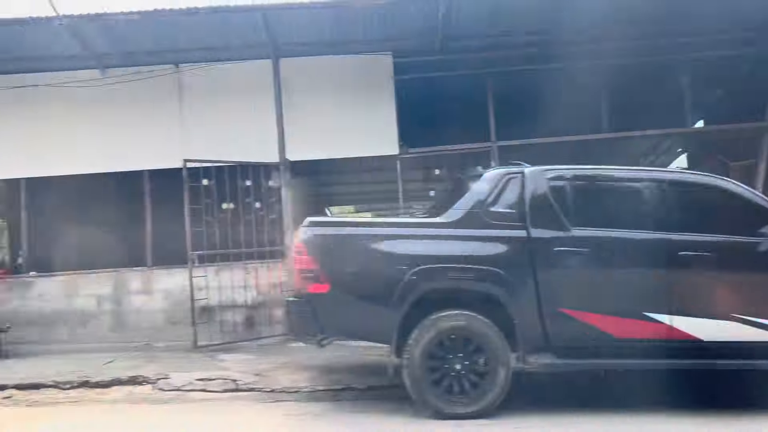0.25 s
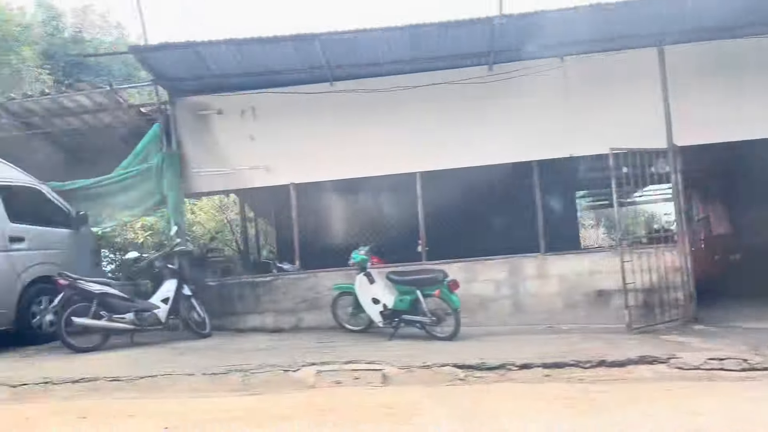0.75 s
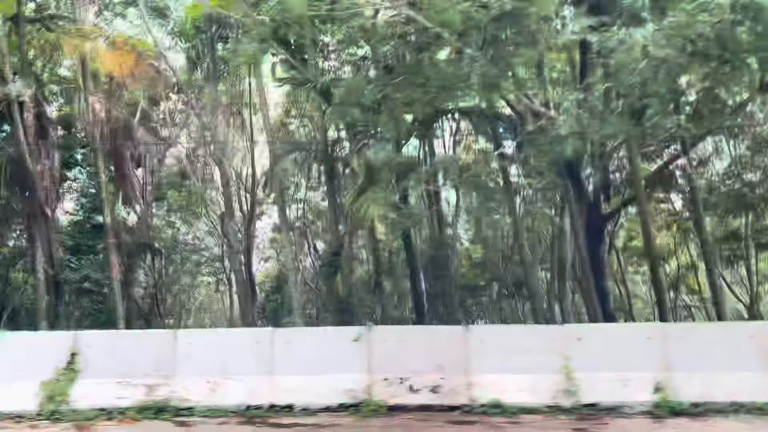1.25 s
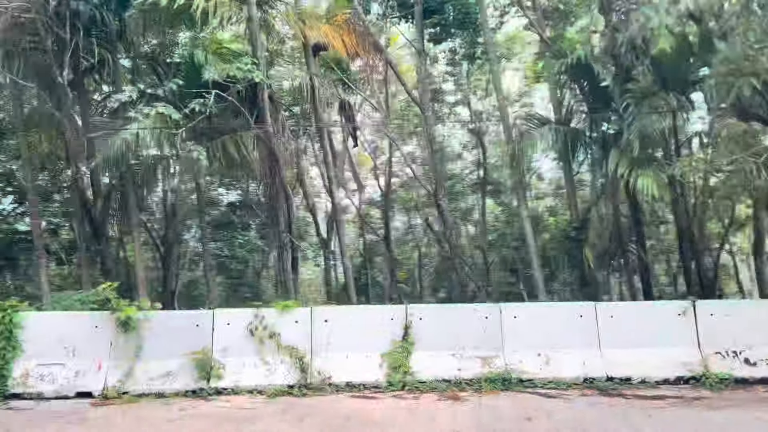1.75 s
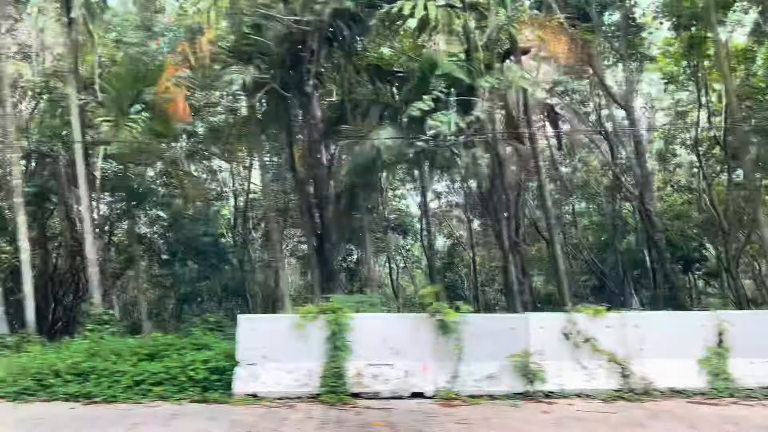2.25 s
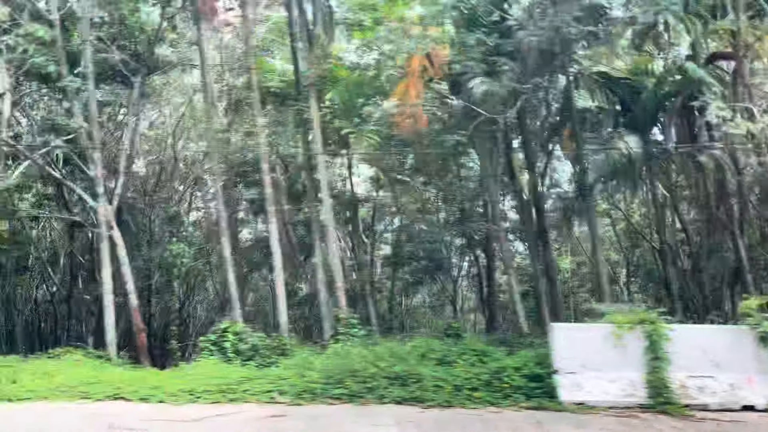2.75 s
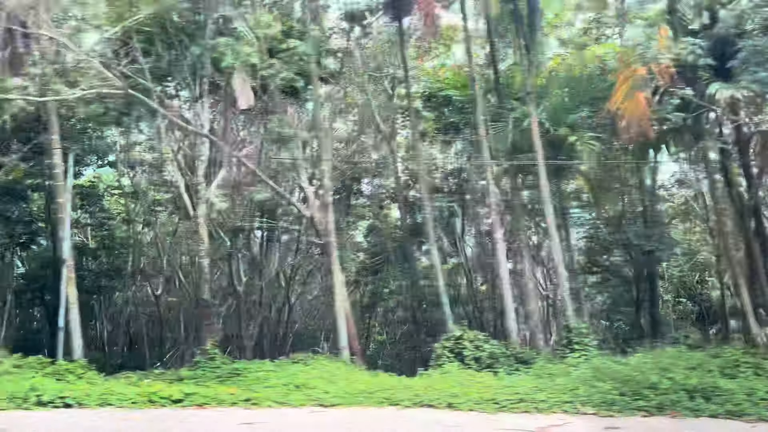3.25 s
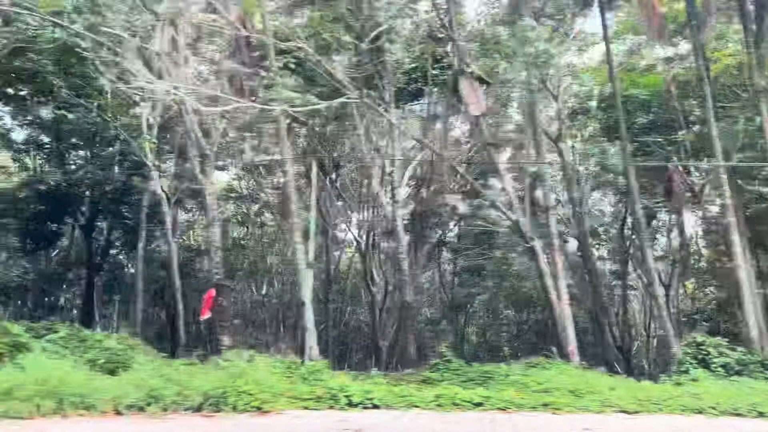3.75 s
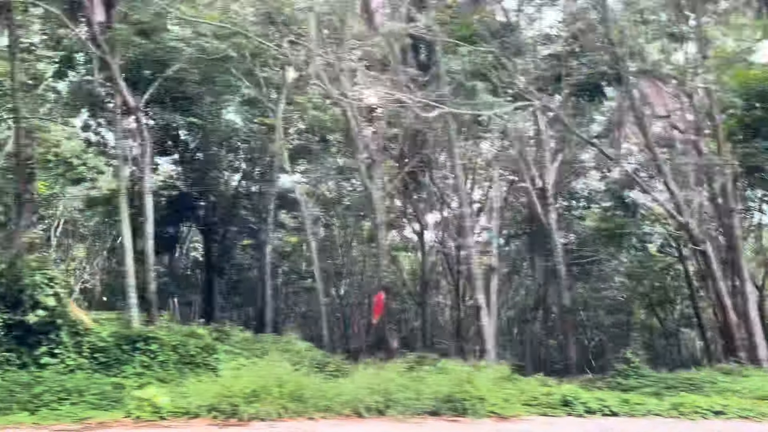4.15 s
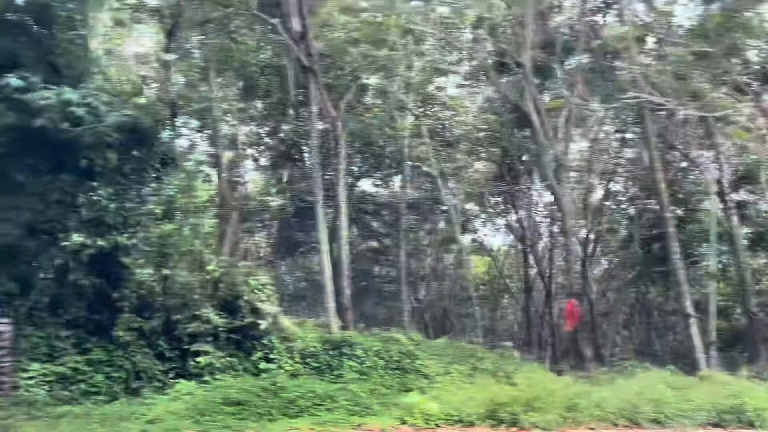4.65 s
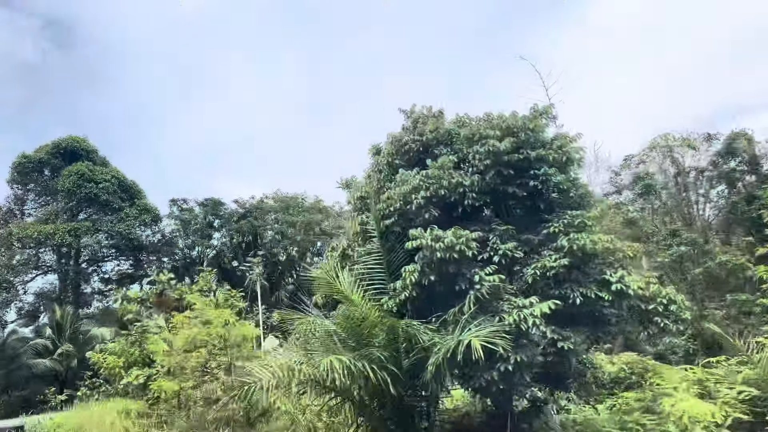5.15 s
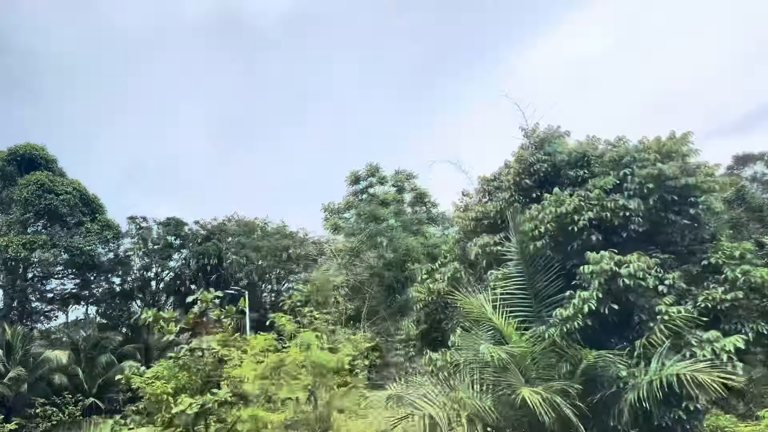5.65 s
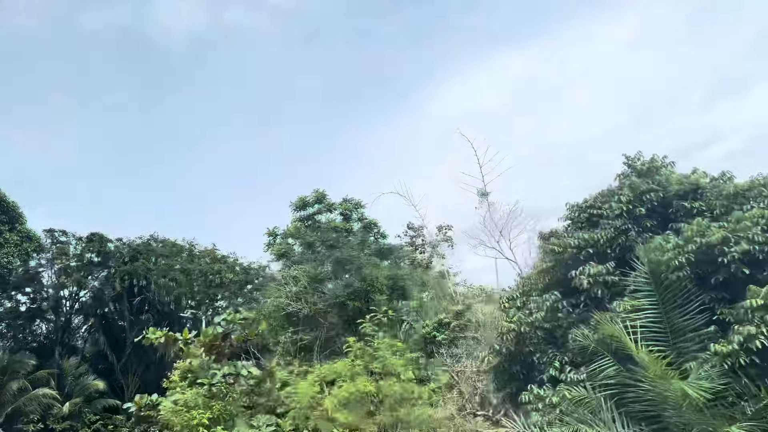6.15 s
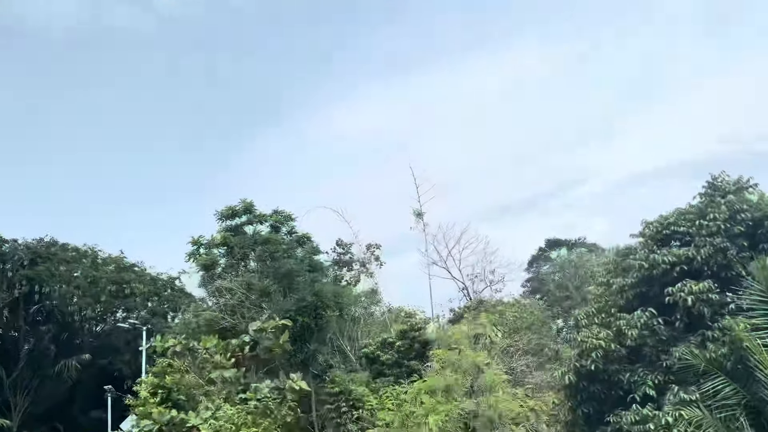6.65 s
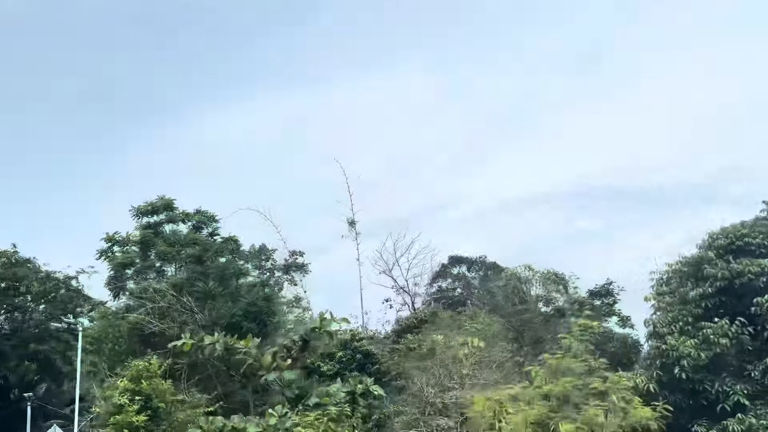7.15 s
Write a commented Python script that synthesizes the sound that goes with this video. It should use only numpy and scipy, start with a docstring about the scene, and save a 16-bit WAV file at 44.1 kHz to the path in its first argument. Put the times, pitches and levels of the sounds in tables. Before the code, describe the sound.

Outdoors in forest, a close cicada sings bursts of very quick falling sweeps around a high pitch, against a dense chorus of others with steady hiss and faint bird notes. Everything stops abruptly just before five seconds. After a tiny gap a dull pop opens a quiet moving vehicle cabin: uneven deep rumble, soft irregular knocks, and loose trim ticking and rattling, growing stronger toward the end.

```python
"""A near cicada sings phrases of quick falling sweeps; others sweep out of step within a noise band of chorus.
A high hissing and a low buzzing kind (band noise), faint chirps, a thin whistle and bird notes lie behind.
The forest stops dead; after a short silence a dull pop (click plus pressure push) opens a moving cabin:
jolting road rumble and body drone (shaped noise), irregular low knocks (damped sines), and trim that
rustles, rattles and ticks (noise and short rings)."""
import sys
import numpy as np
from scipy import signal
from scipy.fft import rfft, irfft
from scipy.io import wavfile
from scipy.ndimage import uniform_filter1d

SR = 44100
rng = np.random.default_rng(int(sys.argv[2]) if len(sys.argv) > 2 else 0)


def transcribe(u):
    """Save the signal u as a 16-bit wav file named by the first command-line argument.

    u: samples, shape (n,) or (channels, n), limited to [-1, 1]; the rate is SR.
    q: integer samples, one column per channel.
    """
    v = np.clip(np.atleast_2d(u).T, -1, 1)
    q = np.round(v * 32767).astype(np.int16)
    wavfile.write(sys.argv[1], SR, q)


N = 326340
TIME = np.arange(N) / SR
CUT_S, POP_S = 4.857, 4.885
TOP_HZ = 15500


def near_cicada(direct_db=-0.5, echo_db=-8, left_db=-2.5, flutter_db=2.5):
    """Quick, fluttering downward sweeps, heard directly and off the trees."""
    song = syllables(phrased_song(), pitch_hz=3792, scatter_hz=18, fall_hz=519.5, half_length_s=.039)
    song = song * unit(undb(flutter_db * walk(420)))
    echo = trees(song, t60_s=0.17, side_db=-7.0)
    return (undb(direct_db) * song + undb(echo_db) * echo) * lean(left_db)


# near cicada phrases: (start_s, end_s, sweeps_per_s, crest_level_db); level before direct_db, echo_db
PHRASES = [(0.041, 0.72, 11.3, -56), (0.929, 1.66, 15, -48.5), (1.757, 2.12, 10.2, -53.5),
           (2.245, 2.78, 13.4, -50), (2.888, 3.16, 11.4, -53), (3.452, 4.11, 14.5, -52),
           (4.172, 4.73, 15.1, -47.5)]


def phrased_song(sag_db=1, scatter_db=1.36):
    """Rows (time_s, level_db): even beat within a phrase, weaker at both ends, sweeps differ a little."""
    rows = []
    for start_s, end_s, sweeps_per_s, crest_db in PHRASES:
        times_s = np.arange(start_s, end_s, 1 / sweeps_per_s)
        sag = sag_db * np.linspace(-1, 1, len(times_s)) ** 2
        scatter = scatter_db * rng.standard_normal(len(times_s))
        rows += zip(times_s, crest_db - sag + scatter)
    return rows


def steady_song(rate_hz, spread_db, unevenness):
    """Rows (time_s, level_db) of a singer that keeps a nearly even beat."""
    times_s = np.cumsum((1 + unevenness * rng.uniform(-1, 1, 180)) / rate_hz)
    levels_db = spread_db * rng.standard_normal(len(times_s))
    return np.column_stack([times_s, levels_db])[times_s < CUT_S]


def syllables(rows, pitch_hz, scatter_hz, fall_hz, half_length_s):
    """In each syllable the ring slides down, fall_hz either side of its pitch, as it swells and fades."""
    out, waver_hz = np.zeros(N), 20 * walk(350)
    for s, level_db in rows:
        near = slice(max(int((s - half_length_s) * SR), 0), int((s + half_length_s) * SR))
        u = np.clip((TIME[near] - s) / half_length_s, -1, 1)
        centre_hz = pitch_hz + scatter_hz * rng.standard_normal()
        phase = tone(centre_hz + waver_hz[near] - fall_hz * u) + 2 * np.pi * rng.random()
        out[near] += undb(level_db) * np.cos(np.pi * u / 2) ** 2.36 * np.sin(phase)
    return out


# spectrum of the merged chorus: (freq_hz, level_db)
CHORUS_SPECTRUM = [(2900, -32), (3250, -16), (3450, -10), (3650, 1.5), (3850, -14.5), (4030, 4.5),
                   (4150, -14), (4300, -14), (4700, -30.5)]


def far_cicadas(count=3, rate_hz=16.0, echo_db=-4, crowd_db=-2, left_db=-3.0):
    """Others of the same kind sweep out of step; behind them the crowd merges into one band."""
    ring = np.zeros(N)
    for _ in range(count):
        rows = steady_song(rate_hz, spread_db=1, unevenness=.2)
        ring += syllables(rows, pitch_hz=3763, scatter_hz=70.9, fall_hz=361.0, half_length_s=.03)
    echo = unit(trees(ring, t60_s=0.31, side_db=-6.5))
    crowd = colour(stereo_noise(-19), CHORUS_SPECTRUM)
    return unit(unit(ring) + undb(echo_db) * echo + undb(crowd_db) * crowd) * lean(left_db)


# spectrum of the hissing kind: (freq_hz, level_db)
HISS_SPECTRUM = [(5600, -32), (6200, -19.5), (6600, -5), (7030, -1), (7300, -5.5), (7600, -16.5),
                 (8000, -20.5), (8800, -32.5)]


def hissing_insects(level_db):
    """A high kind merged into a nearly steady noise band."""
    band = colour(stereo_noise(side_db=-2.5, left_db=1.5), HISS_SPECTRUM)
    return band * undb(level_db + 3.0 + 0.22 * walk(120))


# spectrum of the buzzing kind: (freq_hz, level_db)
BUZZ_SPECTRUM = [(1750, -28), (2030, -8.5), (2190, 2.5), (2310, -1.5), (2450, -22.5), (2700, -15.5)]


def buzzing_insects(level_db):
    """A low kind merged into a noise band of unsteady level."""
    band = colour(stereo_noise(side_db=-4.5, left_db=-1.0), BUZZ_SPECTRUM)
    return band * undb(level_db + walk(60))


def high_chirps(level_db=-81.8, rate_hz=26, echo_db=-5):
    """Faint, quick falling chirps tick away far above the chorus."""
    rows = steady_song(rate_hz, spread_db=1.5, unevenness=.25)
    song = syllables(rows, pitch_hz=11340, scatter_hz=160, fall_hz=700, half_length_s=0.02)
    song = unit(song * undb(3.0 * walk(500)))
    return undb(level_db) * (song + undb(echo_db) * trees(song, t60_s=0.18, side_db=-4))


# thin insect whistle: (time_s, pitch_hz, level_db); level before the direct and tree gains
WHISTLE = [(3.4, 4594, -100), (3.8, 4650, -78), (3.95, 4638, -75), (4.17, 4657, -70), (4.3, 4600, -80),
           (4.85, 4590, -75)]


def insect_whistle():
    """One wavering sine of pulsing level."""
    pitch_hz, level_db = curves(WHISTLE)
    return undb(level_db + 3.2 * walk(40)) * np.sin(tone(pitch_hz + 20 * walk(200)))


# far bird notes: (peak_s, half_pitch_hz, level_db, length_s); level before the direct and tree gains
BIRD = [(0.127, 1530, -73, 0.1), (1.234, 1530, -69.5, 0.051), (2.23, 2290, -77, 0.054)]


def bird_notes():
    """Short bell-shaped notes with a weak partial an octave below."""
    notes = np.zeros(N)
    for peak_s, half_pitch_hz, level_db, length_s in BIRD:
        phase = tone(half_pitch_hz + 26 * walk(250))
        envelope = undb(level_db) * np.exp(-(2 * (TIME - peak_s) / length_s) ** 2)
        notes += envelope * (np.sin(2 * phase) + 0.25 * np.sin(phase))
    return notes


def small_voices():
    """Whistle and bird notes, direct and scattered by the trees."""
    whistle, notes = insect_whistle(), bird_notes()
    return 0.87 * (whistle + notes) + trees(0.44 * whistle + notes, t60_s=0.22, side_db=-8)


# spectrum of the forest air: (freq_hz, level_db)
AIR_SPECTRUM = [(30, 2.5), (130, -3.5), (230, 0.5), (400, -4), (800, -6), (1400, -1.5), (2700, 2),
                (4600, 6), (5600, 0), (9800, 0), (11300, 2), (13500, 0), (15500, -2)]


def forest_air(level_db=-69.0):
    """Faint even hiss."""
    return colour(stereo_noise(side_db=-2.5), AIR_SPECTRUM) * undb(level_db)


# insect levels before trims: (time_s, chorus_db, hiss_db, buzz_db)
INSECT_LEVELS = [(0, -49.5, -62.5, -74.5), (.4, -54.5, -64, -76), (1.2, -50.5, -63, -76.5),
                 (1.9, -52.5, -63.5, -76), (2.6, -52, -64, -76.5), (3.3, -54.5, -63.5, -77.5),
                 (4.1, -53, -63, -74), (4.85, -50.5, -63.5, -75.5)]


def forest(chorus_trim_db=-4.0):
    """All the insects and birds over the air."""
    chorus_db, hiss_db, buzz_db = curves(INSECT_LEVELS)
    cicadas = near_cicada() + far_cicadas() * undb(chorus_db + chorus_trim_db)
    others = hissing_insects(hiss_db) + buzzing_insects(buzz_db) + high_chirps() + small_voices()
    return cicadas + others + forest_air()


def trees(x, t60_s, side_db):
    """Trunks and leaves scatter a sound into a short diffuse tail."""
    size = SR // 2
    tail = stereo_noise(side_db)[:, :size] * 1000 ** (-TIME[:size] / t60_s)
    tail /= np.sqrt(np.sum(tail ** 2) / 2)
    return signal.fftconvolve(x[None], tail, axes=1)[:, :N]


def pop(click_db=-27, click_s=0.00079, push_db=-24, peak_s=0.00577, swell_s=0.0031, release_s=0.00085):
    """A sharp click and a one-sided push of pressure that builds and lets go, dulled by a low-pass."""
    t = np.maximum(TIME - POP_S, 0)
    swell = (peak_s - t) / swell_s
    release = ((t - peak_s) / release_s) ** 2
    push = np.exp(-np.where(t < peak_s, swell, release))
    click = np.exp(-t / click_s)
    pressure = (t > 0) * (undb(click_db) * click + undb(push_db) * push)
    return signal.sosfilt(signal.butter(1, 2500, fs=SR, output="sos"), pressure)


def vehicle(judder_db=3.0, rattle_db=-0.6):
    """Road and body shaken by the ride, trim that rustles and rattles in fits, knocks, ticks and the pop."""
    road, body, trim = shaking()
    trim = trim * undb(judder_db * walk(70))
    ride = road_rumble(road) + body_drone(body) + trim_rustle(trim)
    return ride + rattle() * trim * undb(rattle_db) + knocks() + ticks() + pop()


# steady ride, before layer trims: (time_s, rumble_db, drone_db, rustle_db)
CRUISE = [(4.9, -70.5, -87, -94), (5.14, -77, -82.5, -93), (5.38, -71, -70, -83.5), (5.67, -74, -76, -85),
          (6.03, -68, -62, -84.5), (6.4, -55.5, -66, -81.5), (6.9, -61, -60, -86.5), (7.4, -62, -57.5, -84)]
# bumps that shake the whole cabin, before layer trims: (peak_s, rumble_db, decay_s, rustle_db)
JOLTS = [(4.92, -62, 0.063, -93), (5.334, -56.5, 0.047, -82), (5.446, -56, 0.039, -70),
         (5.613, -59.5, 0.024, -78.5), (5.771, -50, 0.042, -74.5), (5.855, -49.5, 0.058, -80.5),
         (5.951, -52, .025, -91), (6.172, -53.5, 0.041, -76.5), (6.26, -51.5, 0.039, -72),
         (6.306, -50, 0.029, -70.5), (6.506, -47, .035, -69), (6.77, -56, 0.1, -75.5),
         (6.853, -49.5, 0.025, -69.5), (7.006, -46.5, 0.02, -78), (7.09, -48.5, 0.044, -70.5),
         (7.311, -46.5, 0.094, -72.5), (7.395, -49, 0.016, -69)]


def shaking(swell_share=0.79, drone_re_rumble_db=-3.5):
    """Gains of rumble, drone and rustle: the ride plus, in power, a surge that dies away after each bump."""
    road, body, trim = undb(curves(CRUISE))
    for peak_s, rumble_db, decay_s, rustle_db in JOLTS:
        surge = blow(TIME - peak_s, swell_share * decay_s, decay_s)
        road = np.hypot(road, undb(rumble_db) * surge)
        body = np.hypot(body, undb(rumble_db + drone_re_rumble_db) * surge)
        trim = np.hypot(trim, undb(rustle_db) * surge)
    return road, body, trim


# spectrum of the road: (freq_hz, level_db)
ROAD_SPECTRUM = [(15, -8.5), (35, -10), (58, 7), (90, -1), (130, -5.5), (220, -32.5)]


def road_rumble(gain, trim_db=-2.0):
    """Deep noise that follows the shaking."""
    return colour(rng.standard_normal(N), ROAD_SPECTRUM) * gain * undb(trim_db)


# modes of the padded panels, before knock gains: (peak_s, peak_db, pitch_hz, decay_s)
KNOCKS = [(4.91, -44, 391, 0.0081), (4.968, -51.5, 232, 0.0093), (5.002, -44, 198, 0.0074),
          (5.266, -43.5, 391, 0.0083), (5.284, -48.5, 267, 0.016), (5.326, -37, 200.5, 0.011),
          (5.426, -50, 191, 0.014), (5.77, -42, 176.7, .011), (5.848, -41.5, 319, 0.0083),
          (5.857, -22.5, 158.5, 0.0089), (5.896, -48.5, 620, 0.0058), (5.908, -45, 217, 0.016),
          (6.176, -51, 212.7, 0.0085), (6.303, -39.5, 282.2, 0.002), (6.497, -44, 241.4, 0.022),
          (6.525, -37, 195.6, 0.015), (6.785, -44, 198, 0.0084), (6.999, -36, 331.3, 0.014),
          (7.045, -39.5, 279, 0.018), (7.153, -44.5, 319, .028), (7.275, -41, 187, 0.014),
          (7.3, -27, 194.7, 0.0096), (7.301, -39, 424.3, 0.015), (7.34, -43.5, 241.8, 0.014)]
# spectrum of a knock's thud: (freq_hz, level_db)
THUD_SPECTRUM = [(30, -16.5), (150, -1), (400, 1.5), (700, -22), (1100, -24), (1600, -35), (4000, -44)]


def knocks(overtone_db=-24, thud_db=-19, wobble=0.0708, swell_share=0.79):
    """Bumps load a padded panel: it rings unevenly a few cycles with a weak upper mode and a dull thud."""
    out, force = np.zeros((2, N))
    load = wobble * walk(160)  # relative pitch flutter
    for peak_s, peak_db, pitch_hz, decay_s in KNOCKS:
        near = slice(int((peak_s - .1) * SR), int((peak_s + .2) * SR))
        envelope = undb(peak_db) * blow(TIME[near] - peak_s, swell_share * decay_s, decay_s)
        bend = load[near] - np.average(load[near], weights=envelope ** 2)  # mean pitch stays pitch_hz
        phase = tone(pitch_hz * (1 + bend)) + 2 * np.pi * rng.random()
        out[near] += envelope * (np.sin(phase) + undb(overtone_db) * np.sin(1.87 * phase))
        force[near] += envelope
    return out + undb(thud_db) * force * colour(rng.standard_normal(N), THUD_SPECTRUM)


# spectrum of the cabin body: (freq_hz, level_db)
BODY_SPECTRUM = [(70, -17), (130, -0.5), (190, 2.5), (260, -2), (320, 0.5), (390, -13.5), (510, -9.5),
                 (630, -24.5), (800, -23.5), (970, -22.5), (1250, -44), (2500, -43.5)]


def body_drone(gain, trim_db=1):
    """Low noise of the cabin body, jolting and unsteady."""
    return colour(rng.standard_normal(N), BODY_SPECTRUM) * gain * undb(trim_db + 2.85 * walk(45))


# trim slips, before tick_db: (peak_s, peak_rms_db, ring_hz, decay_s)
TICKS = [(4.97, -76, 8500, 0.009), (4.998, -58.5, 6160, 0.0036), (5.0, -76.5, 1360, 0.015),
         (5.147, -78.5, 6000, 0.017), (5.221, -65, 5830, .006), (5.273, -54, 5400, 0.0046),
         (5.446, -52.5, 3450, 0.0032), (5.453, -49, 3120, 0.0023), (5.606, -69, 5430, 0.003),
         (5.729, -68, 6150, 0.0044), (5.781, -59.5, 8300, 0.002), (5.847, -56.5, 1040, 0.014),
         (6.078, -66, 700, 0.015), (6.183, -54.5, 590, .0075), (6.204, -66.5, 1650, 0.0079),
         (6.24, -60, 814, 0.0039), (6.3, -56.5, 1700, 0.0074), (6.484, -56, 920, 0.0034),
         (6.486, -60, 3650, 0.0062), (6.535, -61.5, 2170, 0.0018), (6.682, -67, 870, 0.01),
         (6.744, -52, 4700, 0.0096), (6.767, -60.5, 1580, 0.012), (6.851, -61, 5950, 0.0046),
         (7.078, -55, 5000, 0.0046), (7.108, -61.5, 3870, .004), (7.2, -65, 970, 0.0073),
         (7.266, -54.5, 9700, 0.0034), (7.3546, -48.5, 8150, 0.0027)]
# spectrum of the scrape that goes with a tick: (freq_hz, level_db)
SCRAPE_SPECTRUM = [(1500, -10.5), (3000, -5.5), (5000, 2.5), (7000, 2.5), (8500, -6.5), (9700, 2.5),
                   (11000, -7), (13000, 1), (15500, -11)]


def ticks(tick_db=-0.5, scrape_db=-3, scrape_hz=6000, width=0.26):
    """Loose trim slips in bursts, each ringing its own noise band; the higher the ring, the more scrape."""
    out, size = np.zeros(N), SR // 5
    scrape = undb(scrape_db) * colour(rng.standard_normal(N), SCRAPE_SPECTRUM)
    for peak_s, peak_rms_db, ring_hz, decay_s in TICKS:
        near = slice(int(peak_s * SR) - size // 2, int(peak_s * SR) + size // 2)
        t = TIME[near] - peak_s
        envelope = blow(t, decay_s / 2, decay_s)
        edges_hz = np.clip([ring_hz * (1 - width / 2), ring_hz * (1 + width / 2)], 100, TOP_HZ)
        band = signal.butter(2, edges_hz, "band", fs=SR, output="sos")
        ring = envelope * signal.sosfilt(band, rng.standard_normal(len(t)))
        ring *= np.linalg.norm(envelope) / np.linalg.norm(ring)
        hardness = ring_hz / scrape_hz
        burst = ring + hardness * envelope * scrape[near]
        out[near] += undb(peak_rms_db + tick_db) * burst / np.hypot(1, hardness * undb(scrape_db))
    return out


# spectrum of the trim, rattle and rustle alike: (freq_hz, level_db)
TRIM_SPECTRUM = [(600, -1.5), (1000, -1.5), (1300, -0.5), (1700, 0), (2200, -4.5), (3200, -2), (4500, 0.5),
                 (6000, -8.5), (8500, -10.5), (9200, -6.5), (9650, -3), (10200, -14), (13000, -9),
                 (15500, -16)]


def rattle(count=2200, cycles=10, spread_db=3.0):
    """A dense patter of tiny contacts, each ringing one small part for a few cycles."""
    out, t = np.zeros(N + SR), TIME[:SR // 20]
    for when, pitch, size in rng.random((count, 3)):
        start = int(SR * POP_S + when * (N - SR * POP_S))
        ring_hz = 500 * 24 ** pitch
        strength = undb(spread_db * min(-np.log(1 - size), 3.5)) * np.sqrt(ring_hz)
        ring = np.exp(-2 * ring_hz * t / cycles) * np.sin(2 * np.pi * ring_hz * t)
        out[start:start + len(t)] += strength * ring
    return colour(out[:N], TRIM_SPECTRUM) * np.sqrt(1 - POP_S * SR / N)  # rms about 1 over the ride


def trim_rustle(gain, trim_db=0.0):
    """Finely flickering noise of the trim."""
    return colour(rng.standard_normal(N), TRIM_SPECTRUM) * gain * undb(trim_db + 2 * walk(400))


def blow(t, swell_s, decay_s):
    """Envelope of a cushioned contact: it builds to a peak at t = 0 and is damped away."""
    return np.exp(-np.where(t < 0, (t / swell_s) ** 2, np.abs(t / decay_s) ** 1.09))


def undb(db):
    """Decibels to gain."""
    return 10 ** (np.asarray(db) / 20)


def unit(x):
    """Scale to rms 1."""
    return x / np.sqrt(np.mean(x ** 2))


def lean(left_db):
    """Channel gains that set left against right by left_db."""
    return undb([[left_db / 2], [-left_db / 2]])


def curves(table):
    """The columns of a table, joined by straight lines in time."""
    time_s, *columns = np.transpose(table)
    return [np.interp(TIME, time_s, c) for c in columns]


def colour(x, points):
    """Filter by a spectrum of (freq_hz, level_db) points that falls away beyond its ends; rms 1."""
    hz, db = np.transpose(sorted(points))
    f = np.maximum(np.arange(N // 2 + 1) * SR / N, 1)
    skirts = np.minimum(f / hz[0], 1) ** 2 * np.minimum(hz[-1] / f, 1) ** 10
    gain = undb(np.interp(np.log(f), np.log(hz), db)) * skirts
    return unit(irfft(rfft(x) * gain, N))


def stereo_noise(side_db, left_db=0):
    """White noise in two channels with a given side-to-mid level and lean to the left."""
    mid, side = rng.standard_normal((2, N))
    return unit((mid + undb(side_db) * np.array([side, -side])) * lean(left_db))


def walk(rate_hz):
    """Random levels held 1 / rate_hz and smoothed twice; rms 1."""
    k = int(SR / rate_hz)
    steps = np.repeat(rng.standard_normal(N // k + 1), k)
    return unit(uniform_filter1d(uniform_filter1d(steps, k), k)[:N])


def tone(hz):
    """Phase of an oscillator that follows a pitch curve."""
    return 2 * np.pi * np.cumsum(hz) / SR


def scene():
    """The forest stops dead; after a short silence the ride begins."""
    forest_on = np.clip((CUT_S - TIME) / .002, 0, 1)
    return forest() * forest_on + vehicle() * (TIME >= POP_S)


def record(dry):
    """A steep low-pass cuts the top above TOP_HZ."""
    return signal.sosfilt(signal.ellip(10, .2, 70, TOP_HZ, fs=SR, output="sos"), dry)


dry = scene()
out = record(dry)
transcribe(out)
```